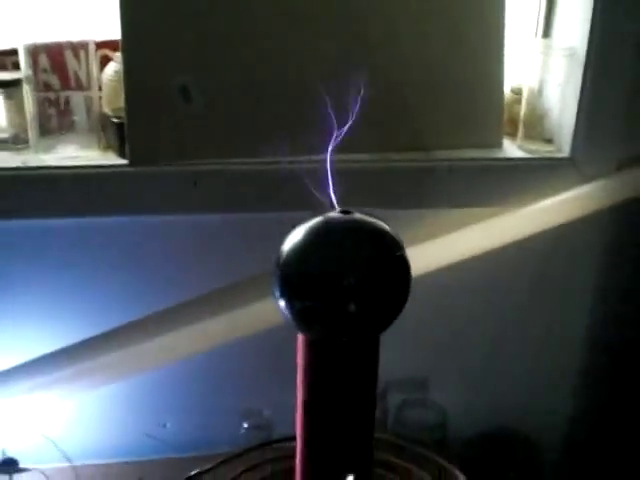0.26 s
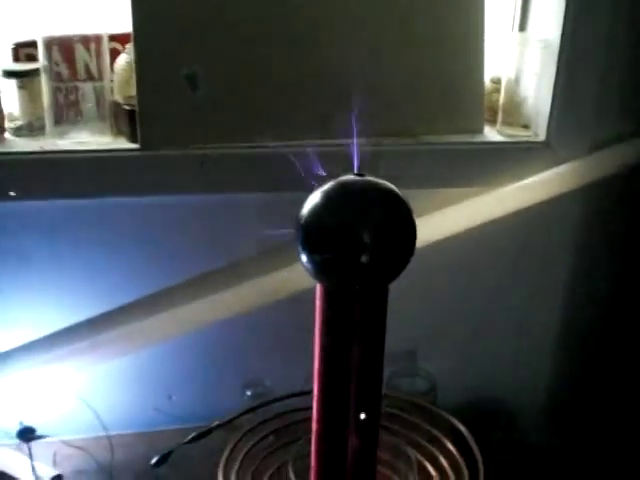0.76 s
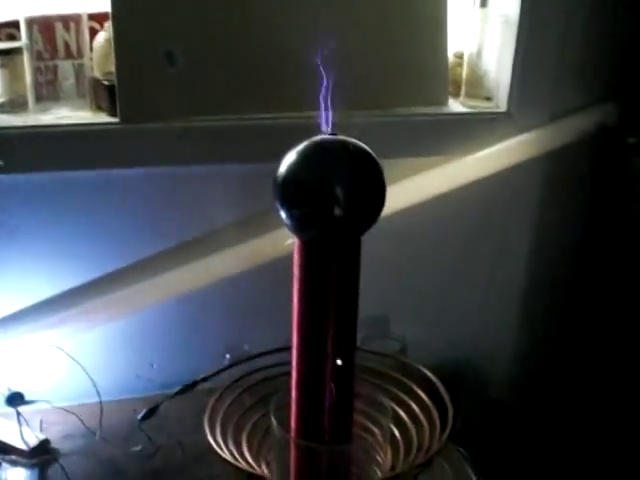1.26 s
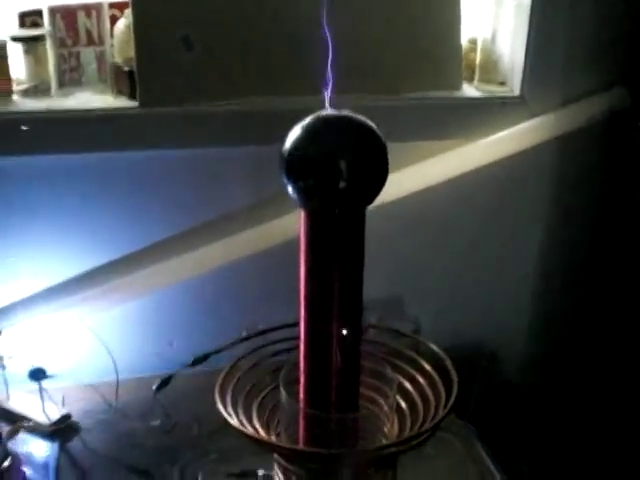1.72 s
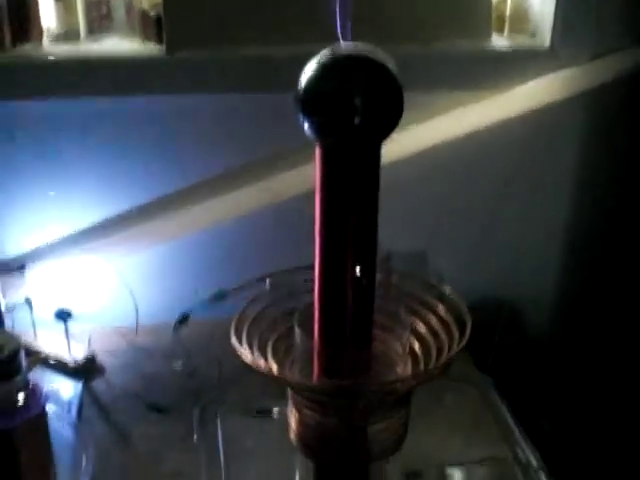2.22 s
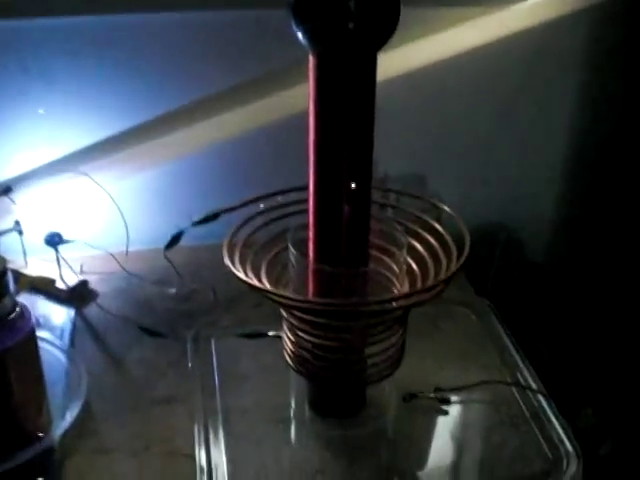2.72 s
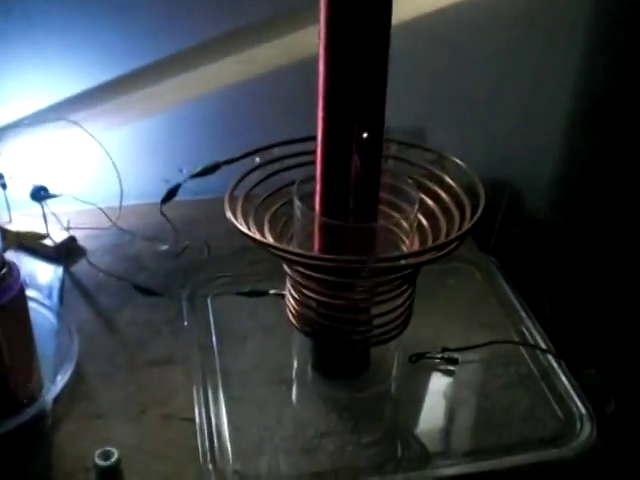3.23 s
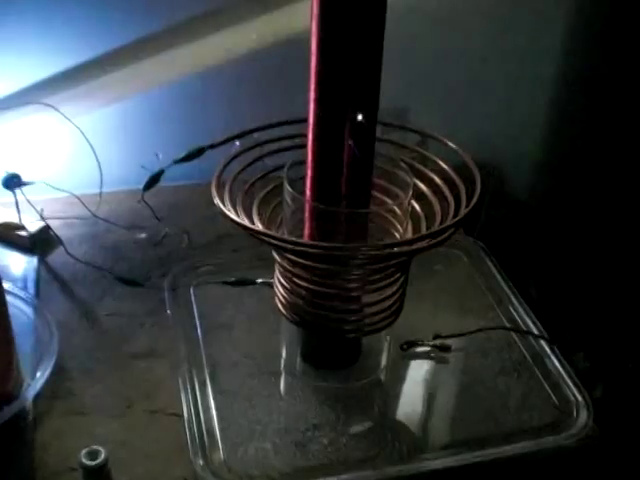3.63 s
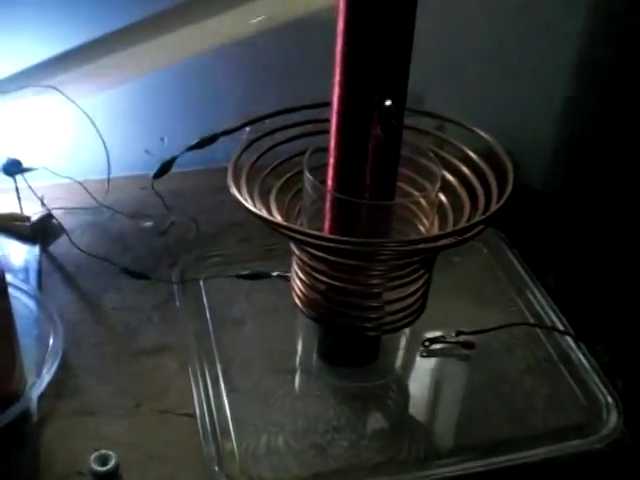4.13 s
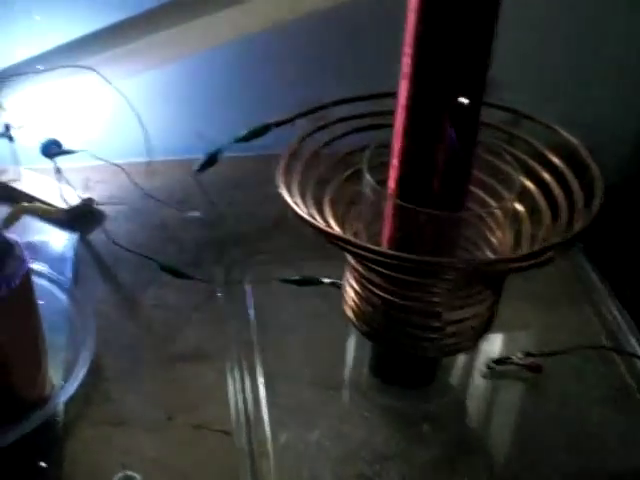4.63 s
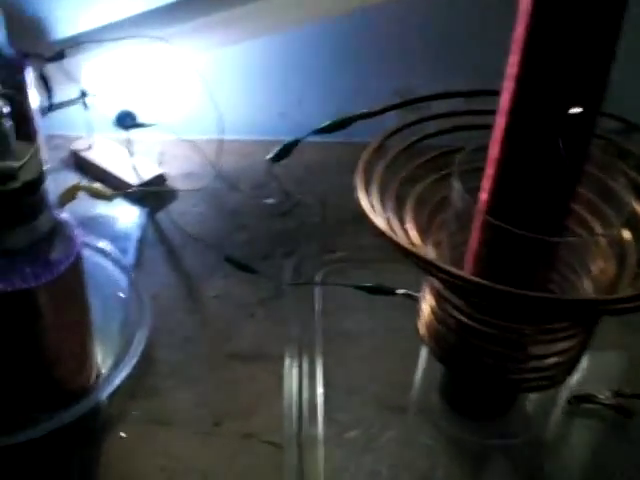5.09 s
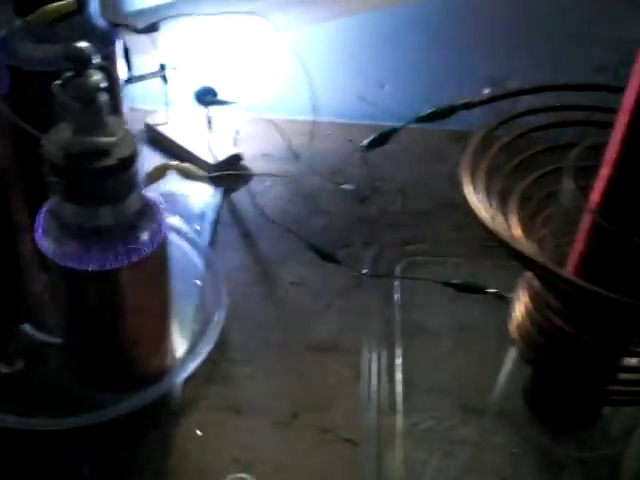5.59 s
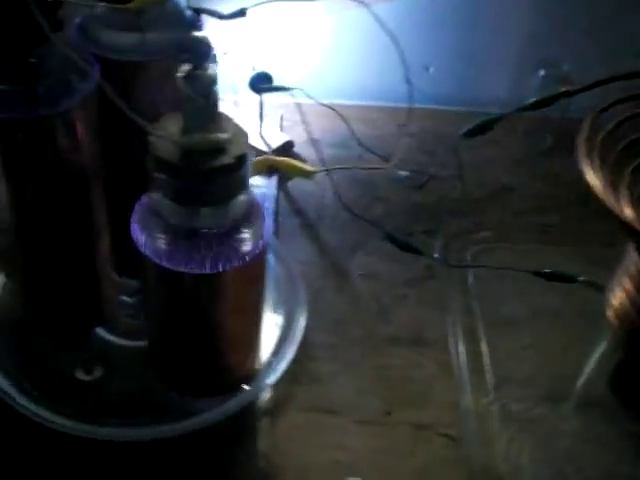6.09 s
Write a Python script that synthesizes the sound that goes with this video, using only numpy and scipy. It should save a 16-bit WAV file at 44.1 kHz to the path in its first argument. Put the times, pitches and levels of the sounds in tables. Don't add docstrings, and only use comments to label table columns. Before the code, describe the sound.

Steady raspy electric buzz of high-voltage sparks, sizzling on top, faint low hum beneath, slightly closer and drier toward the end with thudding pops.

```python
import sys
import numpy as np
from scipy import signal
from scipy.fft import rfft, irfft
from scipy.io import wavfile
from scipy.ndimage import uniform_filter1d

SR = 44100
rng = np.random.default_rng(int(sys.argv[2]) if len(sys.argv) > 2 else 0)


def nominal_scale(level):
    x = np.asarray(level, float) / 20
    return 10 ** x


def transcribe(u):
    v = np.clip(np.atleast_2d(u).T, -1, 1)
    q = np.round(v * 32767).astype(np.int16)
    wavfile.write(sys.argv[1], SR, q)


N = 280035
TIME = np.arange(N) / SR

MAINS_HZ = 60
FFT_SIZE = 16384
MAIN_MS = 1.52

# time in seconds, lag in ms.
VOLLEY_LAG = [(0, .5), (.9, .5), (1.6, .3), (1.9, 1.0), (2.4, .6), (3.6, .9), (4.6, 1.2), (5.1, 1.0),
              (6.35, 1.4)]
# time in seconds, near sound over room in dB, bench echoes in dB, direct crack in dB.
LISTENING_PLACES = [(.25, 6, -2, 1), (.9, 4, -1, -3), (1.7, 3, 1, -2), (2.5, 5, -1, -1), (3.3, 6, 0, -2),
                    (4.1, 7.5, 0, -3), (4.8, 9, 1, -2), (5.25, 12.5, 2, 3), (5.5, 11.5, 1, -2),
                    (6.1, 10.5, 0, -3)]
# time in seconds, coupling in dB.
WIRING_COUPLING = [
    (0, -1),
    (1.1, -2.5),
    (1.9, -4),
    (2.8, -13),
    (4.0, -0.5),
    (5.3, -6),
    (5.6, 6),
    (5.85, 7),
    (6.35, -6),
]


def rms_one(x):
    return x / np.sqrt(np.mean(x ** 2) + 1e-20)


def in_time(rows):
    s, *columns = np.transpose(rows)
    return [np.interp(TIME, s, column) for column in columns]


def drift(rate_hz):
    r = np.exp(-2 * np.pi * rate_hz / SR)
    return rms_one(signal.lfilter([1], [1, -2 * r, r * r], rng.standard_normal(N + SR))[SR:])


def split_filter(x, order, hz, kind):
    return signal.sosfilt(signal.butter(order, hz, kind, fs=SR, output="sos"), x)


def firing():
    misfires = [.033, .083, .575, .733, .842, .9, 1.0, 1.967, 2.2, 2.35, 2.383, 2.467, 2.867, 2.967, 3.55,
                3.575, 3.983, 4.183, 4.417, 4.683, 5.1, 5.508, 5.65, 5.767, 5.842, 6.217, 6.308]
    misfire_db, early_ms = -14, 1.3
    half_wave = np.arange(int(N / SR * 2 * MAINS_HZ)) / (2 * MAINS_HZ)
    missed = np.isin(np.arange(len(half_wave)), np.round(np.array(misfires) * 2 * MAINS_HZ))
    lag_ms = np.interp(half_wave, *np.transpose(VOLLEY_LAG)) - early_ms * np.roll(missed, shift=True)
    return half_wave + lag_ms / 1000, np.where(missed, nominal_scale(misfire_db), 1)


def volleys(jitter_ms, spread_db):
    # delay after the first in ms, chance from 0 to 1, level in dB.
    refires = [
        (0, 1, 0),
        (1.9, .33, -3),
        (3.5, .11, -2),
    ]
    volley_jitter_ms, drain_ms, drain_db = .43, 4.2, -2
    start, fired = firing()
    count = len(start)
    charge_db = 0.32 * rng.standard_normal(count)
    start = start + volley_jitter_ms / 1000 * rng.standard_normal(count).clip(-2, 2)
    out = np.zeros(N)
    for ms, chance, db in refires:
        at = start + (ms + jitter_ms * rng.standard_normal(count)) / 1000
        size = fired * nominal_scale(db + charge_db + spread_db * rng.standard_normal(count))
        size = size * (rng.random(count) < chance)
        np.add.at(out, np.clip((at * SR).astype(int), 0, N - 1), size)
    before = start[:-1][fired[1:] < 1]
    out[((before + drain_ms / 1000) * SR).astype(int)] += nominal_scale(drain_db)
    return out


def corona(width, steady):
    lag_ms, = in_time(VOLLEY_LAG)
    phase = (2 * MAINS_HZ * (TIME - lag_ms / 1000)) % 1
    start, fired = firing()
    half_wave = np.maximum(np.searchsorted(start, TIME) - 1, 0)
    swell = phase / width * np.exp(1 - phase / width) * fired[half_wave] ** 2
    return rng.standard_normal(N) * np.sqrt(swell + steady)


def heard_at(resonances, s):
    fade_db = 4.5
    return [(hz, width, db - fade_db * ((s - best) / reach) ** 2) for hz, width, db, best, reach in resonances]


def crack_shape(spectrum, peaks, s, valley_db):
    # centre in Hz, width in Hz, depth in dB, best time and reach in seconds.
    shadows = [(10000, 610, -3, 2.85, 0.44), (3940, 190, -6, 0.64, 0.28), (3300, 170, -7, 0.83, 0.23),
               (3180, 190, -4, 2.4, 0.87), (3380, 160, -5.5, 4.33, 0.96), (5700, 430, -5, 3.9, 1),
               (7700, 300, 0, 2.4, 0.19), (5600, 590, -2.5, 0.96, 0.48), (1725, 180, -9, 1.0, 0.43),
               (1100, 160, -6, 2.5, .6), (1180, 120, -3.5, 5.4, 0.61), (1680, 110, -3, 4.96, 0.59),
               (850, 52, -6, 3.2, 1), (570, 29, -12, 2.2, 1), (337, 83, -2, 3.1, 0.69),
               (4000, 250, 1, 3.5, 1), (3870, 250, -2, 5.2, .6), (1880, 220, -4, 5.26, .45)]
    hz = np.maximum(np.arange(FFT_SIZE // 2 + 1) * SR / FFT_SIZE, 10)
    corner_hz, corner_db = np.transpose(spectrum)
    power = nominal_scale(2 * (np.interp(np.log(hz), np.log(corner_hz), corner_db) + valley_db))
    for centre, width, db in peaks:
        power = power + nominal_scale(2 * db) / (1 + (2 * (hz - centre) / width) ** 2) ** 2
    for centre, width, db, best, reach in shadows:
        depth_db = db * np.exp(-((s - best) / reach) ** 2)
        power = power * nominal_scale(2 * depth_db / (1 + (2 * (hz - centre) / width) ** 4))
    cepstrum = irfft(np.log(power) / 2)
    cepstrum[1:FFT_SIZE // 2] *= 2
    cepstrum[FFT_SIZE // 2 + 1:] = 0
    return irfft(np.exp(rfft(cepstrum)))


def early_echoes(echo_db):
    # delay after the direct crack in ms, level in dB.
    bounces = [(1.7, -5), (1.86, -3), (2.03, -2), (2.2, -2), (2.38, -4), (2.6, -6), (2.9, -9), (3.5, -13),
               (4.25, -11), (4.9, -13), (5.8, -14)]
    out = np.zeros(400)
    out[int(MAIN_MS * SR / 1000)] = 1
    for (ms, db), shift_ms in zip(bounces, rng.normal(0, .03, len(bounces))):
        out[int(abs(ms + shift_ms) * SR / 1000)] += nominal_scale(db + echo_db)
    return out


def room_tail():
    t60_s, treble_t60_s = 0.27, 0.23
    t = np.arange(int(.4 * SR)) / SR
    noise = rng.standard_normal(len(t))
    dull = split_filter(noise, 1, 3000, "low")
    tail = dull * nominal_scale(-60 * t / t60_s) + (noise - dull) * nominal_scale(-60 * t / treble_t60_s)
    tail *= 1 - np.exp(-t / 0.0042)
    return tail / np.sqrt(np.sum(tail ** 2))


def flattened(paths, smooth_hz):
    paths = [rfft(path, FFT_SIZE) for path in paths]
    broad = np.sqrt(uniform_filter1d(np.abs(sum(paths)) ** 2, size=int(smooth_hz * FFT_SIZE / SR)))
    return [irfft(path / broad) for path in paths]


def crack_paths(s):
    # frequency in Hz, level in dB.
    crack_colour = [(880, -28), (1500, -10.5), (1860, -11.5), (2360, -7), (3250, -4.5), (4410, -6),
                    (5580, -3), (9650, 1), (10400, 3), (12000, 1.5), (15600, -54), (22000, -120)]
    # centre in Hz, width in Hz, level in dB, best time and reach in seconds.
    glints = [(2350, 290, -3, 1.6, 1.3), (2376, 380, -5.5, 3.4, 1.06), (2350, 280, 0, 5.0, 0.82),
              (2420, 150, -9, 6.2, .5), (2820, 125, 3, 0.15, 0.29), (3350, 810, -6.5, 0.091, 0.32),
              (3010, 310, -3.5, 2.8, 0.65), (3490, 150, -2, 6.13, 0.21), (3680, 170, -2, 4.8, 0.59),
              (4570, 160, -1, 2.54, 0.28), (4240, 140, -0.5, 2.67, 0.25), (4370, 330, -2, 3.8, 0.77),
              (4300, 410, -2, 5.27, 0.89), (5280, 120, 1, 5.76, 0.15), (5100, 140, 0, 6.3, 0.18),
              (6240, 200, 2.5, 0.16, .4), (6160, 150, -4, 4.8, 0.24), (6830, 560, -4, 3, 0.97),
              (7370, 290, -2.5, 4.7, 1.7), (7600, 470, -3.5, 1.4, 1.1), (7900, 200, 3, 0.49, 0.42),
              (8480, 260, -1, 4.2, .3), (8260, 150, 1, 4, 1.7), (9240, 160, 2, 1.1, 0.58),
              (9200, 170, -9, .3, 0.53), (10200, 350, -4, 0.52, 0.21), (10330, 320, 0.5, 4.1, 1.4),
              (11870, 620, 2, 0.45, 0.42), (12060, 710, 2.5, 1.96, 0.29), (12070, 200, 0.5, 3.6, 1.3),
              (10600, 600, 3.5, 5.27, 0.3), (11600, 790, 3, 6.6, 1), (8330, 590, 1.5, 5.56, 0.23),
            (10200, 480, 4, 5.94, 0.36), (11670, 280, 1, 5.3, 0.36)]
    # centre in Hz, width in Hz, level in dB.
    shell = [(2130, 1230, -8.5), (4470, 1550, -9), (10360, 420, -5.5)]
    near_db, bench_db, direct_db = [np.interp(s, *pair) for pair in
                                    [(np.transpose(LISTENING_PLACES)[0], column)
                                     for column in np.transpose(LISTENING_PLACES)[1:]]]
    early, first = early_echoes(bench_db), nominal_scale(direct_db)
    scale = nominal_scale(near_db) / np.hypot(np.linalg.norm(early), first)
    bare = crack_shape(crack_colour, [], s, valley_db=0)
    crack = crack_shape(crack_colour, heard_at(glints, s) + shell, s, valley_db=-4.0)
    bare, crack = bare / np.linalg.norm(bare), crack / np.linalg.norm(crack)
    direct = irfft(rfft(bare) / rfft(crack))
    paths = (scale * first * direct, scale * early, room_tail()[:FFT_SIZE - 384])
    direct, near, far = flattened(paths, smooth_hz=260)
    crack = crack[:4000]
    return signal.oaconvolve(crack, direct + near), signal.oaconvolve(crack, far)


def room_modes(s):
    # frequency in Hz, level in dB per Hz.
    floor = [(35, -80), (60, -4), (118, -6.5), (329, -15.5), (389, -8.5), (732, -11), (1100, -6.5),
             (1840, -3.5), (2200, -18.5), (2860, -50), (4840, -120)]
    # centre in Hz, width in Hz, level in dB, best time and reach in seconds.
    local_modes = [(612, 16, -1, .2, 0.68), (759.6, 53, 0, 2.3, 2.3), (684, 190, 0.5, 6.5, 3.36),
                   (963, 13, -24, 0.17, 0.39), (1021.5, 39, 0.5, 3.9, 3.4), (940, 310, 5, 6.73, 0.55),
                   (1230, 23, -3, 1.5, 0.5), (1187, 18, 1.5, 3.1, 0.71), (1386, 38, 1.5, 1.8, 2.4),
                   (1315, 11.7, 5.5, 5.6, 2.3), (1430, 16, 1, 7.1, 0.5), (1539, 37, 3, 4, 2.2),
                   (1696, 15, 5, 5.1, 1.3), (1852, 24, 8, 3.25, 0.79)]
    # centre in Hz, width in Hz, level in dB.
    deep_modes = [(271, 23, -5), (397.6, 16.6, 0), (511.8, 8.6, 1.5), (622, 30, -5.5), (920, 18, -1.5)]
    modes = crack_shape(floor, heard_at(local_modes, s) + deep_modes, s, valley_db=-3.5)
    return modes / np.linalg.norm(modes)


def even(x):
    return x / np.sqrt(uniform_filter1d(x ** 2, size=4410))


def spark_gap():
    # time in seconds, crack level in dB.
    pan = [(0.0, -25), (0.25, -25), (0.35, -22.5), (0.46, -25), (1.13, -26), (1.86, -24), (2.65, -26),
           (3.18, -24.5), (3.78, -25), (4.07, -23), (4.21, -25.5), (4.58, -23), (4.65, -25), (5.43, -23),
           (5.57, -24), (6.33, -23.5), (6.35, -25)]
    place_step_s = .3
    crack_db, = in_time(pan)
    near_db = in_time(LISTENING_PLACES)[0]
    body_db = -17.5 - 0.29 * near_db
    corona_db = -6.5 + 0.084 * near_db
    cracks = rms_one(volleys(jitter_ms=.25, spread_db=-1.23))
    gap = cracks + nominal_scale(corona_db) * rms_one(corona(width=0.33, steady=0.027))
    diffuse = nominal_scale(1.0) * np.roll(cracks, shift=int(MAIN_MS * SR / 1000)) + rng.standard_normal(N)
    bright, body = np.zeros(N + 40000), np.zeros(N + 40000)
    places = np.arange(0, N / SR + place_step_s, place_step_s)
    for k, s in enumerate(places):
        here = np.interp(TIME, places, np.arange(len(places)) == k)
        start, stop = np.flatnonzero(here)[[0, -1]]
        near, far = crack_paths(s)
        layers = ((bright, here * gap, near),
                  (bright, np.sin(np.pi / 2 * here) * gap, far),
                  (body, here * diffuse, room_modes(s)))
        for out, source, response in layers:
            heard = signal.oaconvolve(source[start:stop + 1], response)
            out[start:start + len(heard)] += heard
    body = even(split_filter(body[:N], 4, 1900, "low"))
    bright = even(split_filter(bright[:N], 4, 1900, "high"))
    shimmer = nominal_scale(.3 * drift(8.8)) - 1
    bright = bright + shimmer * split_filter(bright, 1, 6500, "high")
    return nominal_scale(crack_db) * (-bright + nominal_scale(body_db) * body)


def pickup():
    # time in seconds, level in dB.
    strong_pops = [(0.0008, -34.1), (0.1365, -37.5), (0.2447, -37.3), (0.2603, -35.3), (0.4693, -37.3),
                   (0.5696, -36.2), (0.7863, -36.5), (0.8381, -30.6), (0.8935, -36.8), (0.9349, -38.5),
                   (1.0186, -34.6), (1.1862, -38.6), (1.2114, -36.1), (1.2519, -35.0), (1.3199, -31.5),
                   (1.5356, -38.1), (1.6702, -37.0), (1.8362, -36.2), (2.0022, -37.1), (4.1527, -33.8),
                   (5.6863, -27.8), (5.7605, -32.2), (5.7638, -31.0), (5.7765, -33.0), (5.8026, -25.1),
                   (5.8531, -32.2), (5.9023, -36.9), (5.9201, -31.6), (6.0026, -31.6), (6.1693, -37.6)]
    # time in seconds, level in dB.
    weak_pops = [(.0924, -38), (.1014, -40), (.1094, -39), (.1256, -40), (.2339, -38), (.5362, -40),
                 (.5517, -37), (.6022, -39), (.6530, -40), (.6941, -40), (.7019, -39), (.8858, -38),
                 (.9688, -38), (1.0346, -37), (1.0858, -40), (1.2850, -39), (1.4040, -40), (1.7359, -39),
                 (1.7689, -40), (1.8863, -40), (1.9195, -40), (2.5032, -40), (2.5188, -40), (3.7361, -38),
                 (4.3692, -39), (4.4524, -40), (4.5951, -40), (4.6034, -40), (4.6187, -40), (5.0532, -40),
                 (5.2365, -39), (5.5368, -39), (5.6183, -39), (5.7452, -38), (5.8273, -38), (5.8717, -39),
                 (5.9539, -38), (6.0865, -37), (6.1854, -40)]
    weak_trim_db = -3
    crackle_db, crackle_follows, crackle_spread_db = -47.5, 0.94, 5.5
    kicks = np.zeros(N)
    coupling_db, = in_time(WIRING_COUPLING)
    start, fired = firing()
    at = start + (.8 + .4 * rng.standard_normal(len(start))) / 1000
    at = (at * SR).astype(int).clip(0, N - 1)
    size_db = crackle_spread_db * rng.standard_normal(len(at)).clip(-3, 1)
    kicks[at] = fired * nominal_scale(crackle_db + crackle_follows * coupling_db[at] + size_db)
    pops = np.vstack([strong_pops, np.add(weak_pops, [0, weak_trim_db])])
    kicks[np.maximum(np.round(pops[:, 0] * SR).astype(int) - 18, 0)] = nominal_scale(pops[:, 1] + 10.5)
    t = np.arange(600) / SR
    pulse = np.exp(-t / .0009) - np.exp(-t / .00009)
    return signal.oaconvolve(kicks, pulse)[:N]


def hum():
    coupling_db, = in_time(WIRING_COUPLING)
    phase = 4 * np.pi * MAINS_HZ * TIME - 1.4 + .2 * drift(3)
    level_db = -62.5 + 0.74 * coupling_db + 1.0 * drift(6.7)
    return np.sqrt(2) * nominal_scale(level_db) * np.cos(phase)


def scene():
    return (spark_gap() + pickup() + hum())[None]


def roll_off(x):
    return signal.sosfilt(signal.butter(12, 13400, fs=SR, output="sos"), x)


def record(dry):
    x = split_filter(.7 * np.tanh(dry / .7), 1, 70, "high")
    rumble_cut = signal.butter(6, 52, "high", fs=SR, output="sos")
    x = signal.sosfiltfilt(rumble_cut, x, padtype="even", padlen=4000)
    x = signal.lfilter(*signal.iirnotch(7848, 45, fs=SR), x)
    x = signal.sosfiltfilt(signal.ellip(12, .2, 60, 12045, fs=SR, output="sos"), x)
    return roll_off(x)


dry = scene()
out = record(dry)
transcribe(out)
```